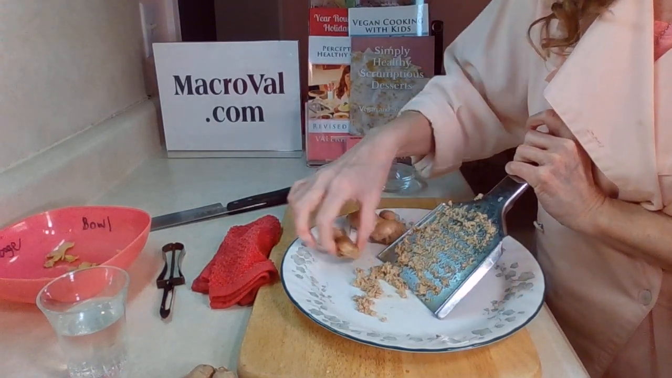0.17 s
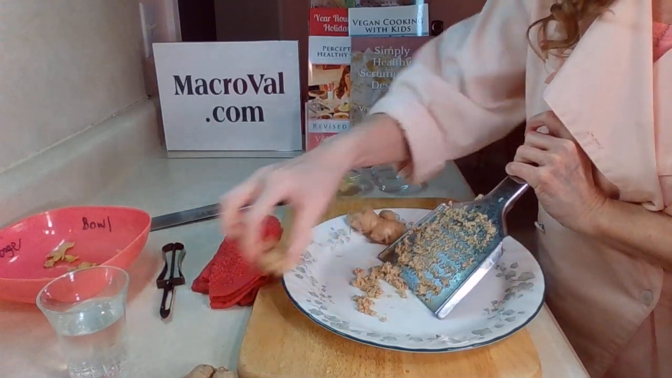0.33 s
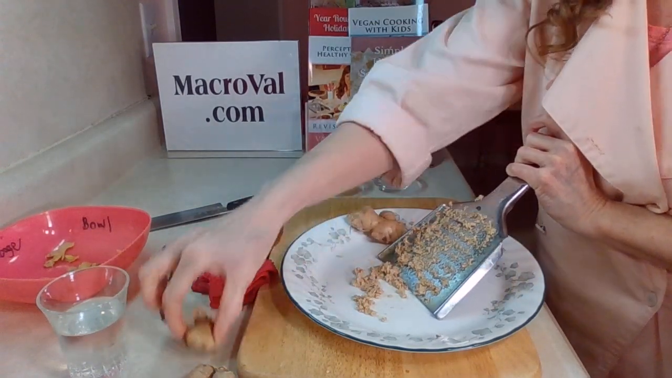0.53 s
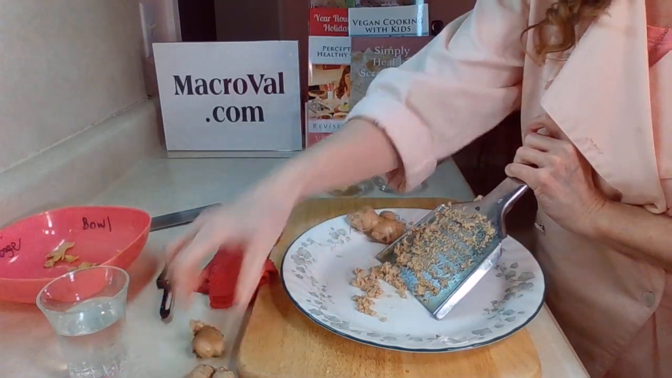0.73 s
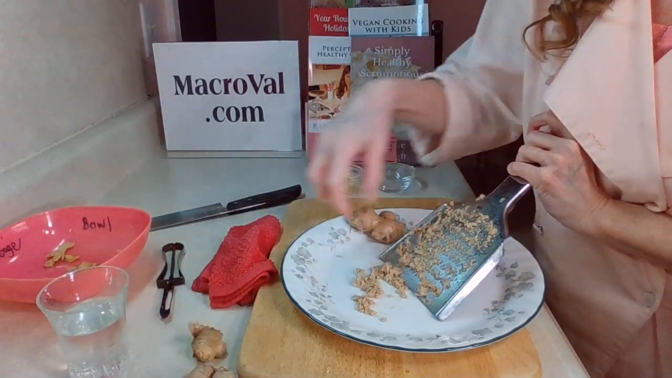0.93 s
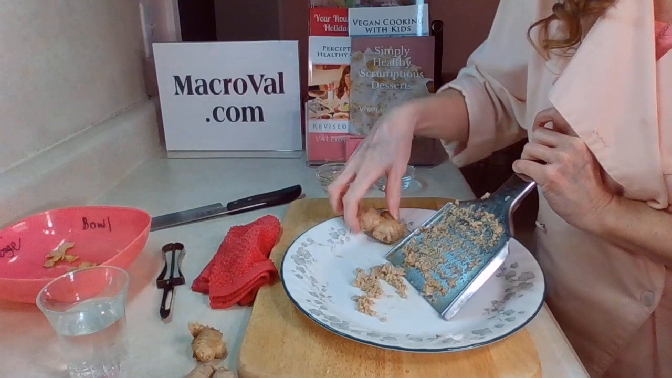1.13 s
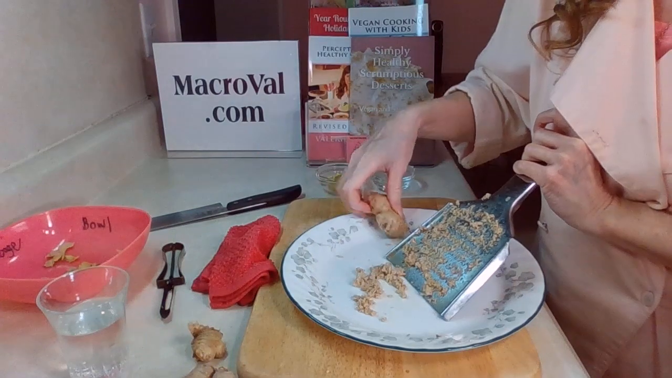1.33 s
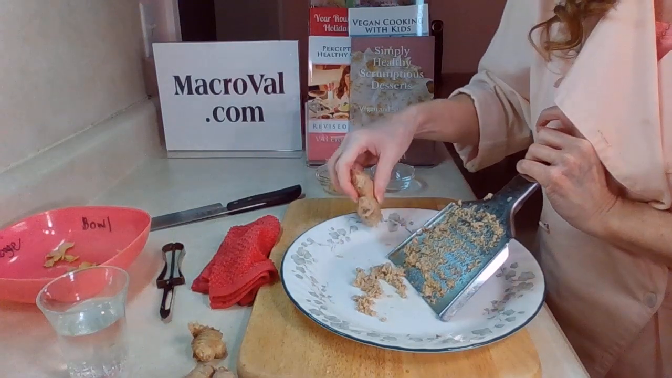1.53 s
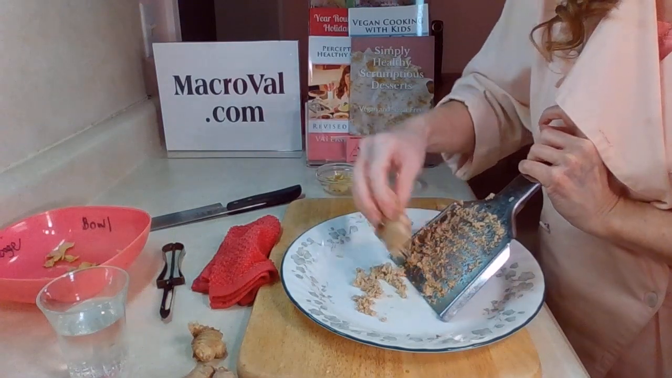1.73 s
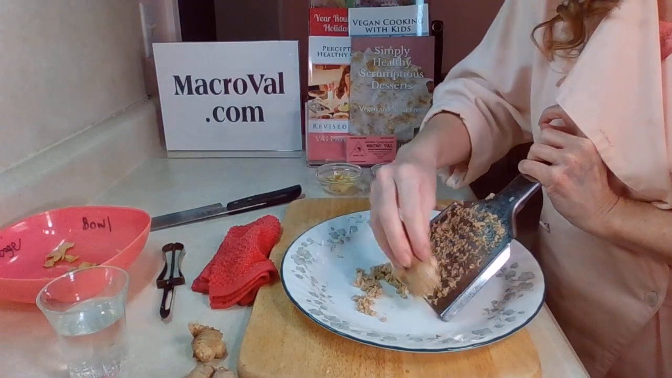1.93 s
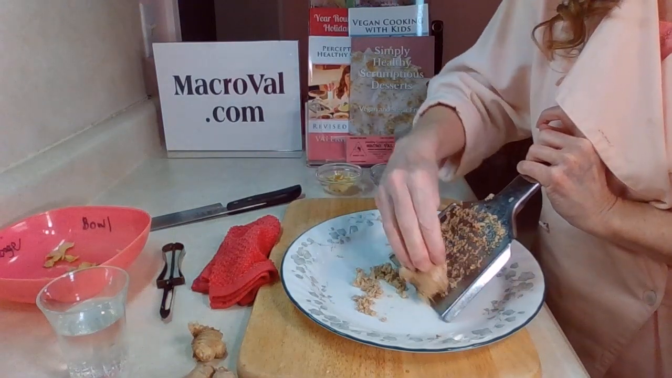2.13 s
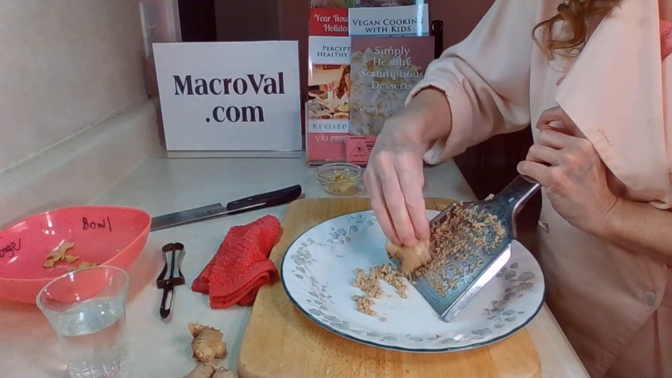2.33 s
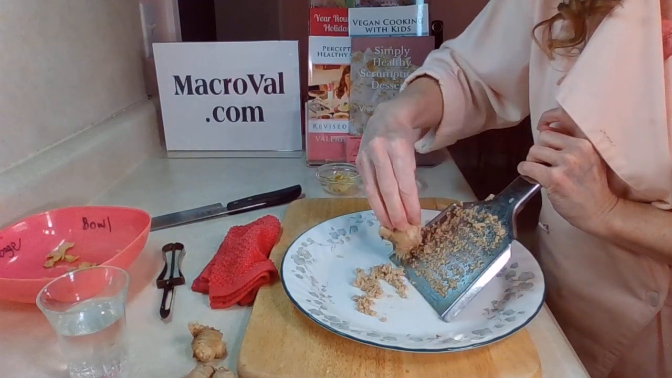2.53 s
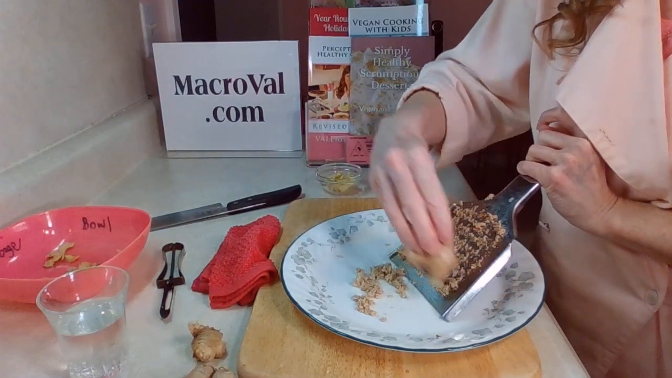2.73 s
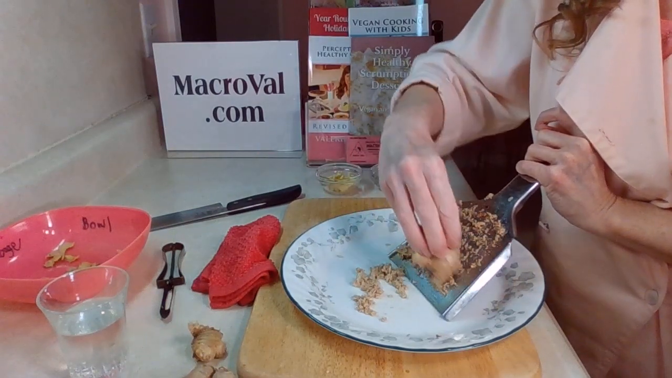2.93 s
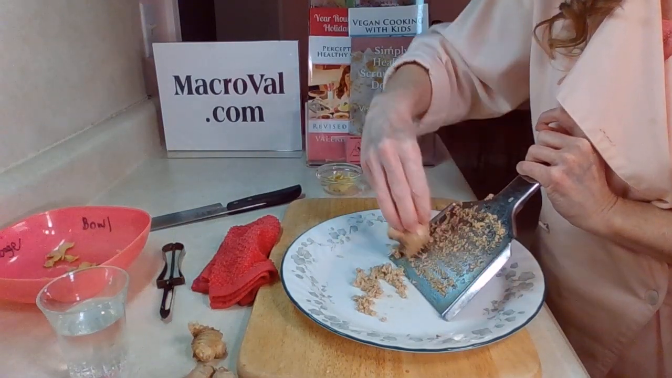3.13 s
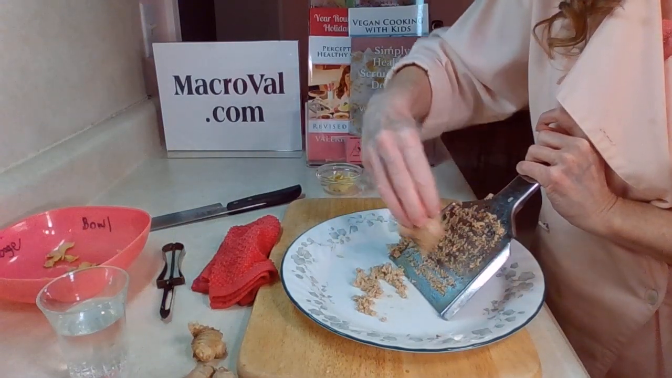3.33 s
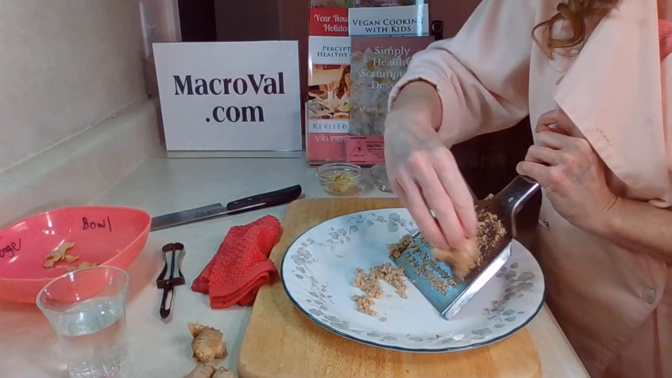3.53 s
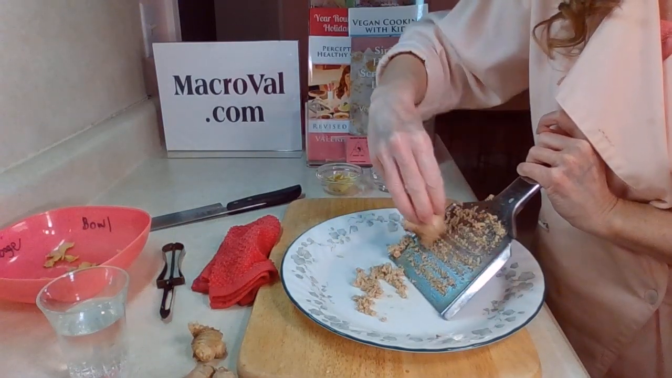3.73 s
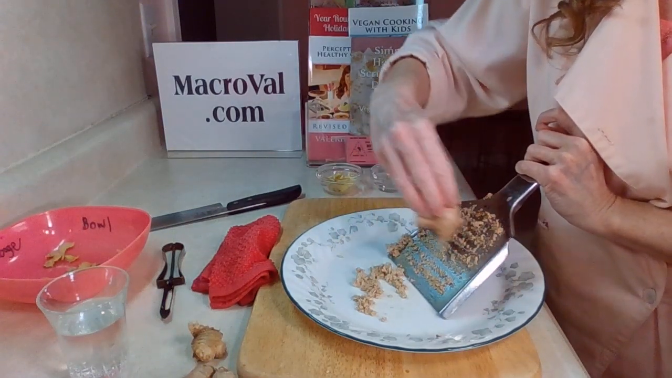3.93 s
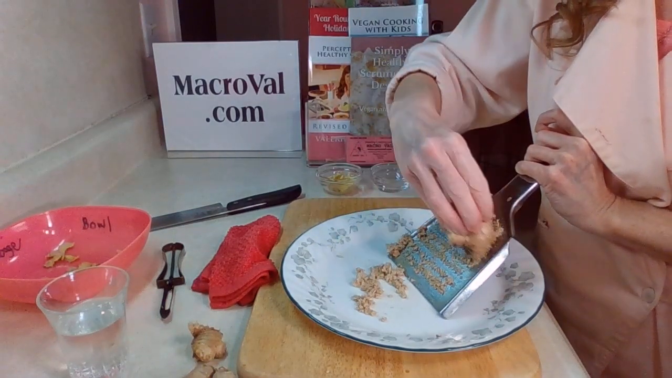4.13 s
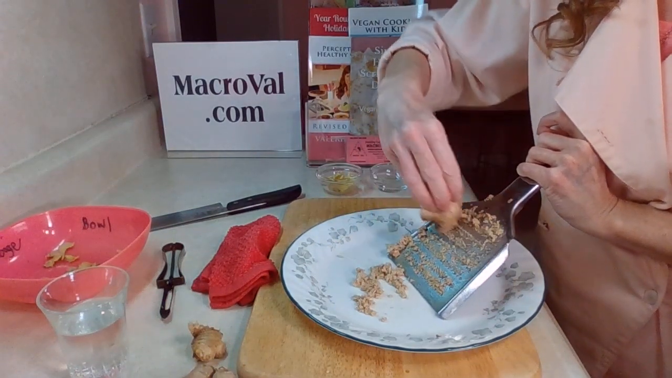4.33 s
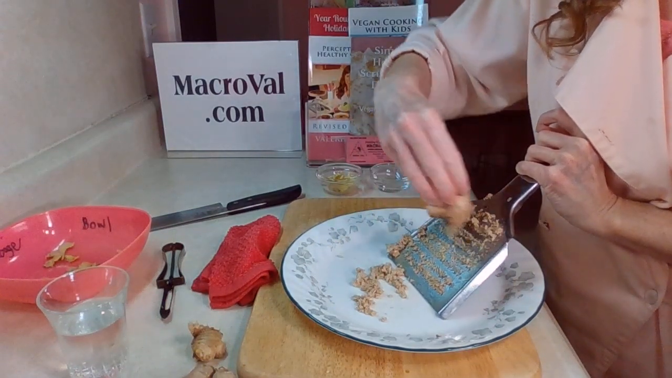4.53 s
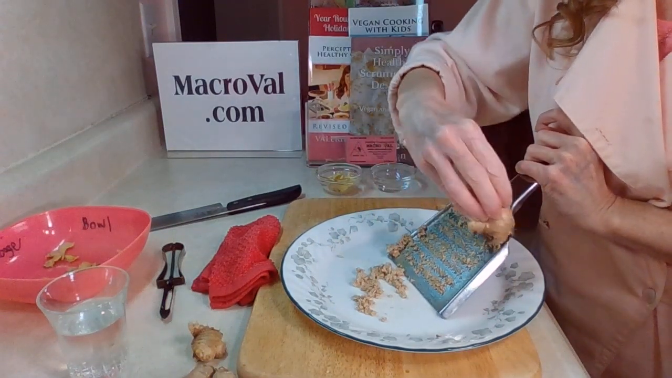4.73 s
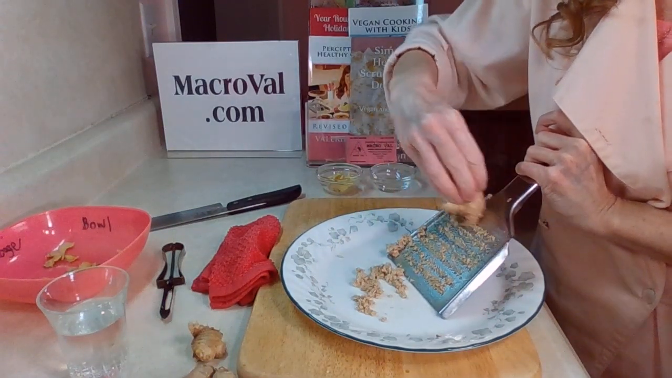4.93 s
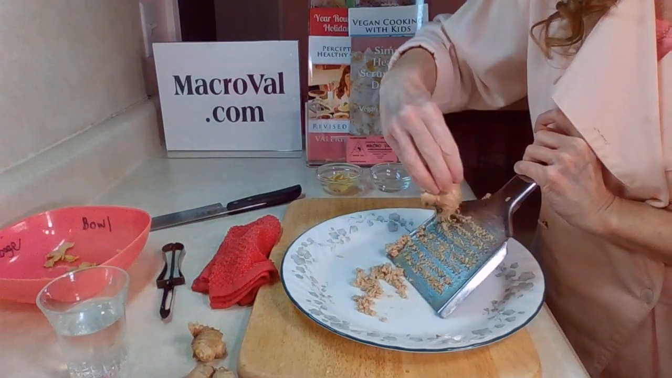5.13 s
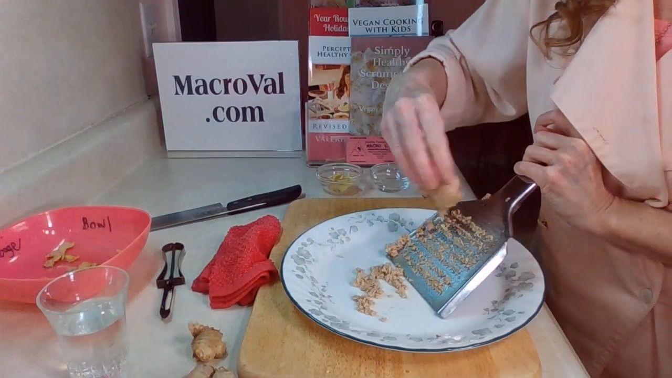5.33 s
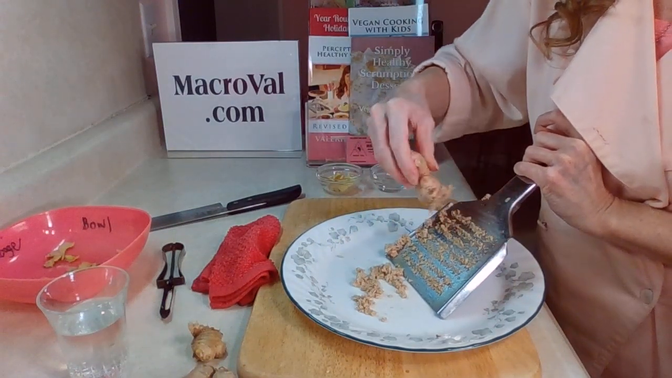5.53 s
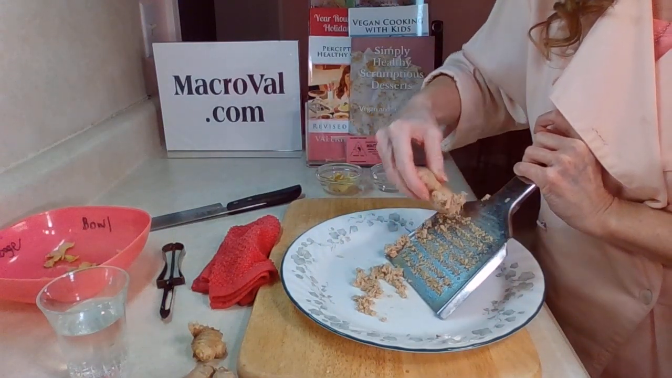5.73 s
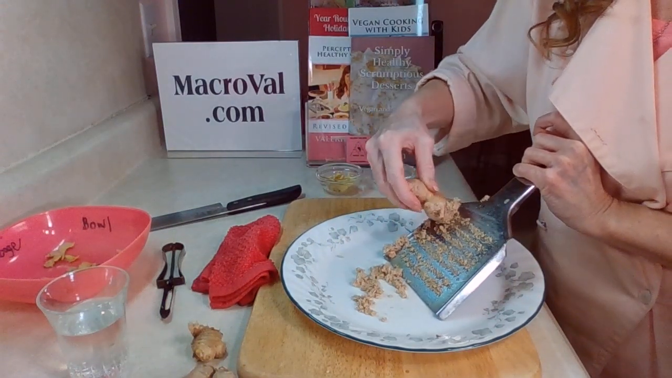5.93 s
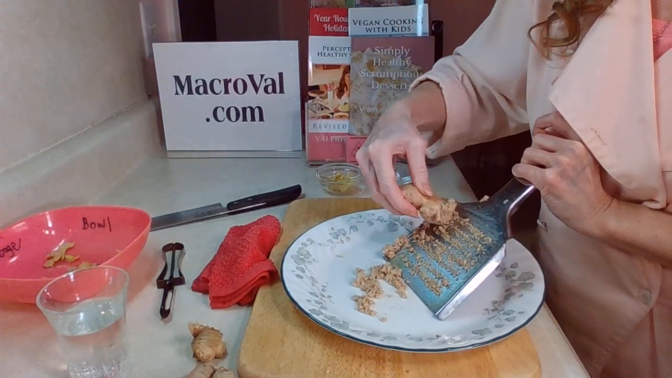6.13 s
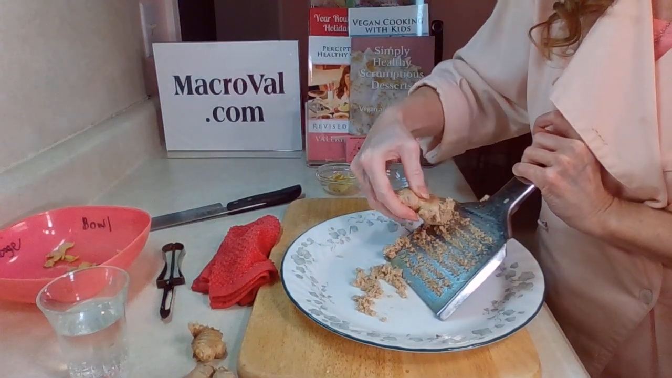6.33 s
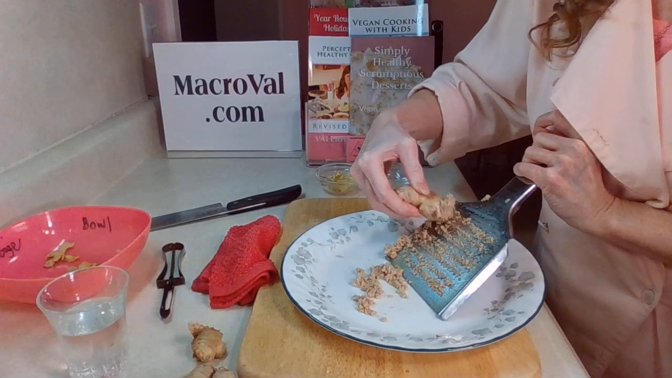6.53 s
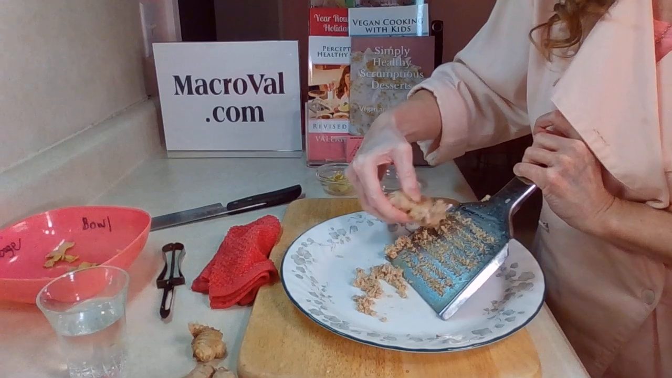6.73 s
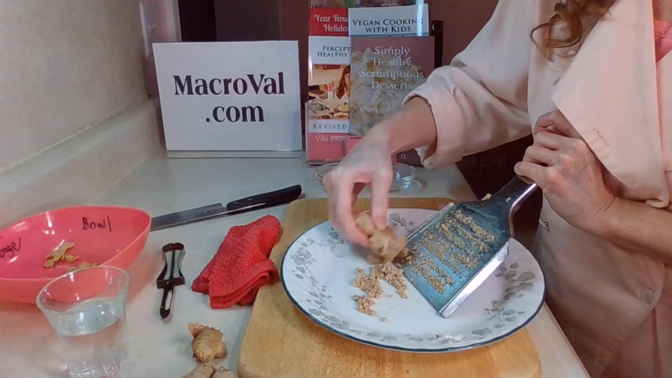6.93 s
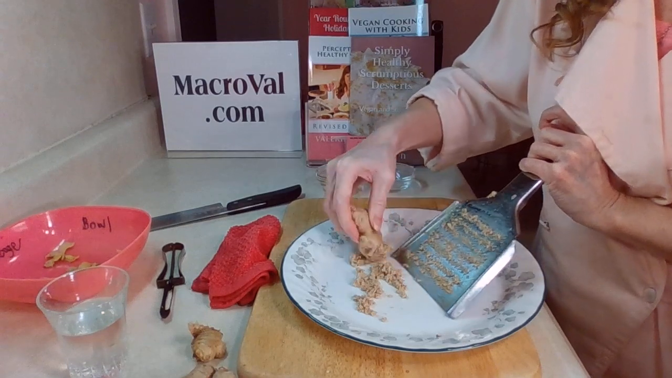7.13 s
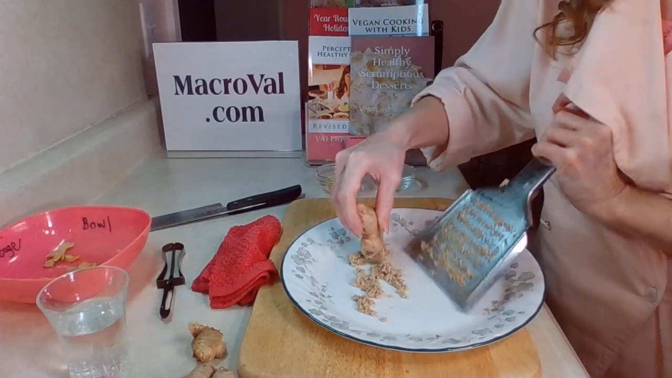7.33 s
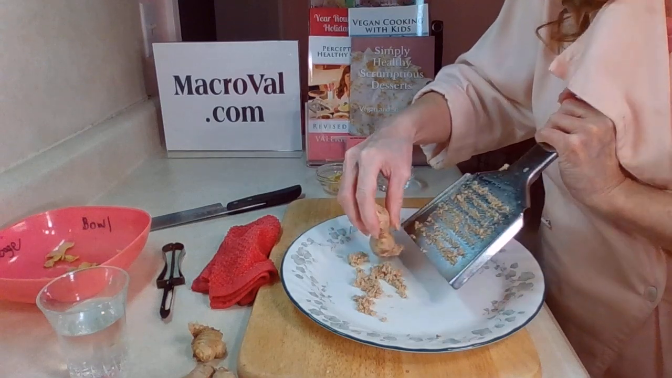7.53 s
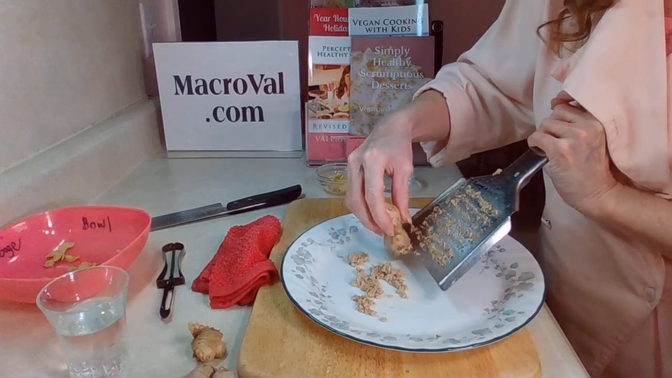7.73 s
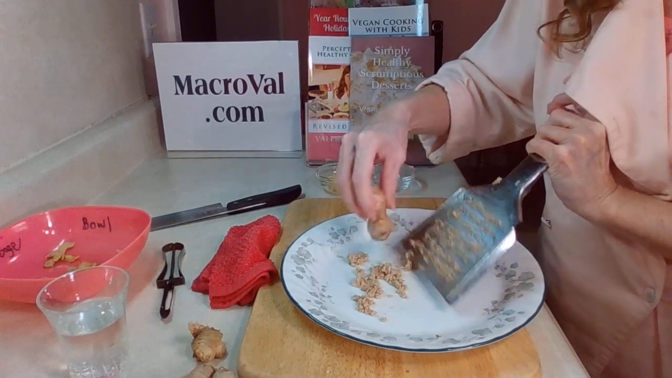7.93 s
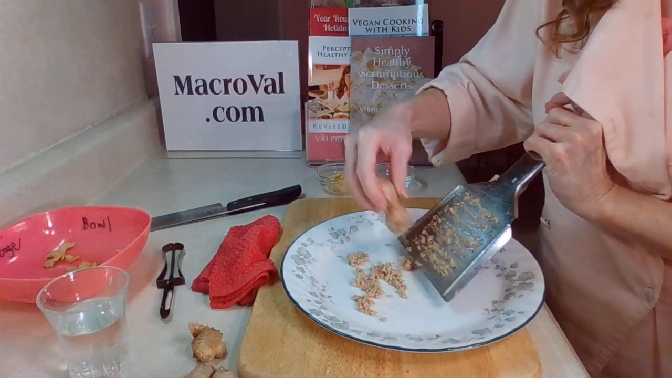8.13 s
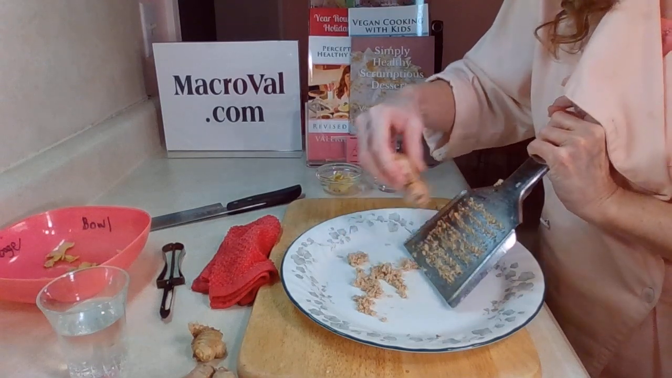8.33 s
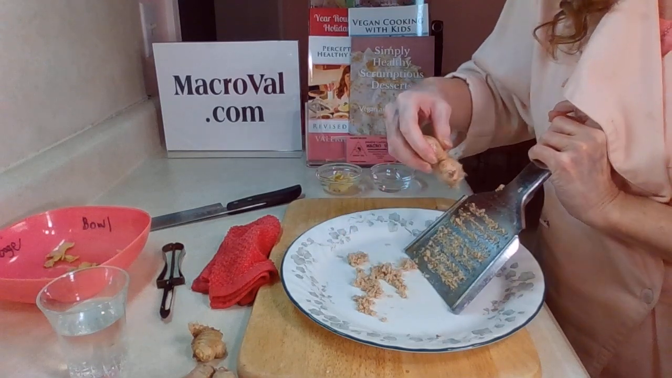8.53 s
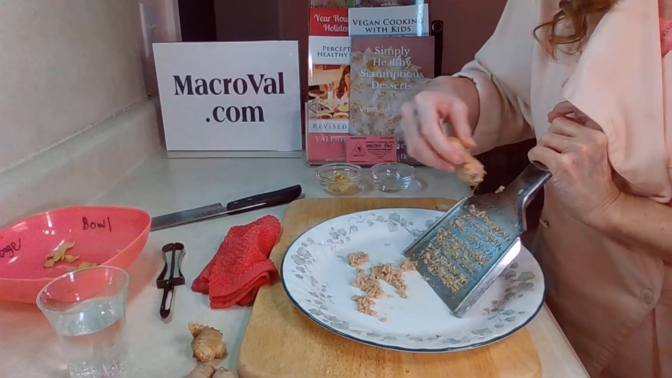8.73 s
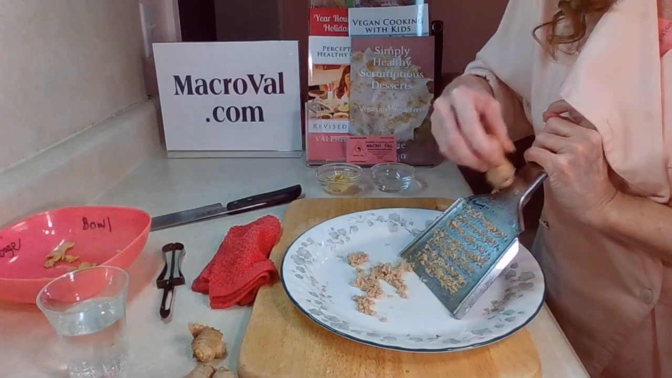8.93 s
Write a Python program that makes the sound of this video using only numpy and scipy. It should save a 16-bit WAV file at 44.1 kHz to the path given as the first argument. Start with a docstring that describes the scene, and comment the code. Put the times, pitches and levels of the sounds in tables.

```python
"""A sleeve rustles over a low mains hum and a thin high hiss, then a piece of ginger drops on the counter.
Another is picked up and grated on a metal grater resting on a china plate in a small, quiet kitchen.
In each stroke, random clicks under a pressure curve tear wet fibres, shake the sheet and judder the board.
The steel edge knocks on the plate: sums of decaying modes plus shaped noise bursts.
Thuds are dulled noise; cloth, air and hiss are coloured noise; the hum is sines."""
import sys
import numpy as np
from scipy import signal
from scipy.fft import rfft, irfft, next_fast_len
from scipy.io import wavfile

SR = 44100
rng = np.random.default_rng(int(sys.argv[2]) if len(sys.argv) > 2 else 0)


def store_pcm(level_fs):
    """Save levels as 16-bit WAV."""
    pcm = np.round(np.clip(level_fs, -1, 1) * 32767).astype(np.int16)
    wavfile.write(sys.argv[1], SR, np.atleast_2d(pcm).T)


N = 396018
TIME = np.arange(N) / SR
RING = TIME[:SR // 2]  # time axis of one blow
SPAN = len(RING)


def undb(db):
    """Decibels to gain."""
    return 10 ** (np.asarray(db) / 20)


def unit(x):
    """Scale to rms 1."""
    return x / np.sqrt(np.mean(x ** 2))


def attack_unit(x, size=800):
    """Scale a blow so that its first samples have rms 1."""
    return x / np.sqrt(np.mean(x[:size] ** 2))


def decay(t60):
    """Exponential decay that falls 60 dB in t60 seconds."""
    return np.exp(-np.log(1000) * RING / t60)


def fader(s, db):
    """Gain along a level curve, silent outside it."""
    return undb(np.interp(TIME, s, db)) * (TIME >= s[0]) * (TIME <= s[-1])


def gesture(s, hold, attack, release, easing_db=0, quiet_db=-25):
    """One move of the hand: swells until s, falls by easing_db while held (rises if negative), dies away."""
    times = [s - attack, s, s + hold, s + hold + release]
    return fader(times, [quiet_db, 0, -easing_db, quiet_db - easing_db])


def shape(x, gain):
    """Filter by a gain that is a function of frequency."""
    size = next_fast_len(len(x))
    hz = np.maximum(np.fft.rfftfreq(size, 1 / SR), 1)
    return irfft(rfft(x, size) * gain(hz), size)[:len(x)]


def colour(x, points):
    """Give x a spectrum of (Hz, dB) points, at rms 1."""
    hz, db = np.transpose(points)
    return unit(shape(x, lambda f: undb(np.interp(np.log(f), np.log(hz), db))))


def tilt(x, slope_db):
    """Brighten or dull by dB per octave, levelling out below 500 Hz."""
    return shape(x, lambda f: undb(slope_db * np.log2(np.hypot(f, 500) / 2000)))


def low_cut(x, hz):
    """Small bodies radiate no deep bass."""
    return signal.sosfilt(signal.butter(2, hz, "high", fs=SR, output="sos"), x)


def resonance(f, hz, width):
    """Response of one damped resonance, 1 at its centre."""
    return 1 / (1 + 1j * (f * f - hz * hz) / (f * width))


def ripple(depth_db=2.0, count=700):
    """Crowded weak modes of one object: a fixed pattern of fine peaks and dips, weaker below 1500 Hz."""
    db = depth_db * np.clip(rng.standard_normal(count), -2, 2)
    return lambda f: undb(np.interp(f, np.linspace(0, SR / 2, count), db) * f / np.hypot(f, 1500))


def walk(rate):
    """Random wander with a spread near 1, rate in new values per second."""
    knots = rng.standard_normal(N // 20)
    return np.interp(TIME * rate, np.arange(len(knots)), knots)


def grains(rate, spread_db):
    """Random clicks, rate per second; a positive spread makes a few large, a negative one a few faint."""
    spread = undb(spread_db * np.minimum(rng.exponential(size=N), 5))
    sizes = rng.standard_normal(N) * spread
    return unit(sizes * (rng.random(N) < rate / SR))


def flat_noise():
    """Equal energy at all frequencies with scattered phases: very many modes at once."""
    return irfft(np.exp(2j * np.pi * rng.random(SPAN // 2 + 1)))


def ring(modes, detune=0.0018):
    """Decaying modes after one blow, each randomly detuned a little."""
    hz, db, t60 = np.transpose(modes)[:, :, None]
    hz = hz * (1 + detune * rng.standard_normal(hz.shape))
    waves = np.sin(2 * np.pi * (hz * RING + rng.random(hz.shape)))
    return attack_unit(np.sum(undb(db) * waves * decay(t60), axis=0))


def contact(length, rest_db, t60):
    """Envelope of a blow: full while the two things chatter, then a weaker decay."""
    chatter = 1 / np.sqrt(1 + (RING / length) ** 8)
    return chatter + undb(rest_db) * decay(t60)


def add(out, s, x):
    """Mix the first 0.4 s of a blow in at time s."""
    i = int(s * SR)
    x = x[:SPAN * 4 // 5]
    out[i:i + len(x)] += x[:N - i]


def shifting(x, depth_db, rate):
    """Each band swells on its own as the root crosses different teeth."""
    bands = [shape(x, lambda f: resonance(f, hz, 0.45 * hz) ** 2) for hz in np.geomspace(2500, 15000, num=9)]
    return x + sum(band * (undb(depth_db * walk(rate)) - 1) for band in bands)


# Strokes and lighter rubs. Each row: full pressure at seconds, hold in seconds, tearing in relative dB,
# push on the sheet in relative dB, weight on the board in dB over the push, easing while held in dB.
STROKES = [(2.235, 0.034, -65.5, -56.5, 2.5, 10), (2.32, 0.12, -55.5, -55.5, 4, -2.5),
           (2.54, 0.019, -55.5, -56.5, 0, 5), (3.026, 0.21, -53.5, -50, 2.5, 5),
           (3.7, 0.15, -53, -50, 2.5, 1), (3.96, 0.037, -71.5, -71, 4.5, 0),
           (4.275, 0.17, -56, -56, 0.5, -2.5), (5.083, 0.051, -58.5, -62.5, -4.5, -5.5),
           (5.885, 0.0044, -62.5, -57.5, 0.5, 3.5), (5.96, 0.028, -72, -66.5, 0, -2),
           (7.2, 0.19, -62, -61.5, -5, -0.5)]
# Spectrum of snapping fibres before the low cut. Each row: frequency in Hz, relative level in dB.
FIBRE_SPECTRUM = [(410, -46), (700, -5), (919, 5.5), (1070, 2), (1320, -17), (1970, 4), (2160, -12),
                  (2730, -7.5), (5710, -5.5), (15500, -4)]
# Sheet under the pressing hand. Each row: resonance in Hz, width in Hz, mean relative level in dB.
SHEET_MODES = [(450, 30, 0.5), (587, 32, 5), (1029, 63, -3), (1161, 37, -16.5), (1437, 74, -18),
               (2154, 45, -4), (3500, 140, -19.5), (5794, 110, -13)]
# Plate and board under the strokes. Each row: frequency in Hz, relative level in dB.
BOARD_SPECTRUM = [(30, -16.5), (55, -6), (80, -3.5), (115, 5.5), (165, 1.5), (200, -8), (240, 1),
                  (320, -12.5), (440, -8.5), (600, -4.5), (720, -19), (1000, -29), (2000, -57)]
BITE_S, TEAR_RELEASE_S, PUSH_RELEASE_S = 0.11, 0.12, 0.16  # the sheet shakes on after the tearing
UNEVEN_DB = 0.5  # wobble of the hand's pressure


def grating():
    """Teeth catch and tear fibres in uneven bursts that also ring the sheet and shake plate and board."""
    tearing, push, weight = np.zeros((3, N))
    for s, hold_s, tear_db, push_db, weight_db, easing_db in STROKES:
        tearing += undb(tear_db) * gesture(s, hold_s, BITE_S, TEAR_RELEASE_S, easing_db)
        pressure = undb(push_db) * gesture(s, hold_s, BITE_S, PUSH_RELEASE_S, easing_db)
        push += pressure
        weight += undb(weight_db) * pressure
    catch = unit(undb(2.5 * walk(rate=130) + UNEVEN_DB * walk(rate=38)))

    snaps = colour(grains(rate=2600, spread_db=-1.5), FIBRE_SPECTRUM)
    fibres = shape(snaps, lambda f: f / np.hypot(f, 2800))
    # the thin steel lends the crackle its many small peaks
    fibres = shape(fibres, ripple(depth_db=2.5, count=160))
    fibres = shifting(fibres, depth_db=3.2, rate=38)

    tugs = grains(rate=1200, spread_db=0.8)
    sheet = np.zeros(N)
    for hz, width_hz, db in SHEET_MODES:
        # each mode swells as the root passes its antinodes
        swell = undb(db + 1.5 * walk(rate=14))
        sheet += swell * shape(tugs, lambda f: resonance(f, hz, width_hz))

    board = colour(grains(rate=1100, spread_db=-2.0), BOARD_SPECTRUM)
    return catch * (undb(1.4) * tearing * unit(fibres) + undb(-4) * push * unit(sheet) + weight * board)


# Single fibres snap or wet pulp smacks. Each row: start in seconds, relative level in dB, centre in Hz.
SNAPS = [(1.761, -61.5, 14000), (1.87, -66.5, 13000), (2.153, -61.5, 12100), (2.398, -44, 8540),
         (2.936, -60.5, 12000), (3.095, -49.5, 11000), (3.266, -52, 6900), (3.6, -55.5, 12600),
         (3.705, -48, 10200), (3.867, -50, 13000), (4.201, -54.5, 13300), (5.143, -53, 7000),
         (5.655, -63, 13100), (5.878, -58, 12500)]
# The wet root slides over the sheet. Each row: fullest at seconds, hold in seconds, relative level in dB,
# centre in Hz at the fullest moment.
SLIDES = [(4.335, 0.037, -61, 7750), (5.11, 0.023, -59.5, 7620), (6.974, 0.088, -45.5, 12230)]
SLIDE_ATTACK_S, SLIDE_RELEASE_S, SLIDE_FALL_OCT_PER_S = 0.12, 0.037, 3.1


def pulp():
    """Fibres snap as resonant noise bursts; the sliding root hisses as noise on a falling carrier."""
    out = np.zeros(N)
    for s, db, hz in SNAPS:
        burst = shape(flat_noise(), lambda f: resonance(f, hz, 0.36 * hz))
        add(out, s, undb(db) * unit(burst) * contact(length=0.0074, rest_db=-26.5, t60=0.06))
    fizz = unit(shape(rng.standard_normal(N), lambda f: 1 / (1 + (f / 1900) ** 2)))
    fizz *= undb(1.5 * walk(rate=150))
    for s, hold_s, db, hz in SLIDES:
        fall_s = np.clip(TIME - s, -SLIDE_ATTACK_S / 2, 1)
        centre_hz = hz * 2 ** (-SLIDE_FALL_OCT_PER_S * fall_s)
        hiss = unit(fizz * np.cos(2 * np.pi * np.cumsum(centre_hz) / SR))
        out += undb(db) * gesture(s, hold_s, SLIDE_ATTACK_S, SLIDE_RELEASE_S) * hiss
    return out


# The grater meets the plate. Each row: start in seconds, attack level in dB, plate's share of power 0-1,
# chatter length in seconds, brightness in dB per octave.
KNOCKS = [ (1.191, -66, .5, 0.0088, 2), (3.598, -63, 0, 0.011, 0), (3.914, -55.5, 0.1, 0.011, -6.5),
          (4.834, -19.5, 0.15, 0.012, -1), (5.821, -47, 0.02, .013, -1.5), (6.776, -62, .1, 0.036, -0.5),
          (6.854, -22, 0.42, .014, -1), (7.251, -55.5, 0, 0.015, -3), (7.271, -51.5, 0, 0.012, -1),
          (7.328, -56, 0, 0.014, -2), (7.344, -51.5, 0.09, 0.014, -3), (8.506, -16.5, 0.99, 0.014, -0.5),
          (8.519, -17.5, 1, 0.021, -1), (8.56, -19, 0.9, 0.017, -0.3), (8.743, -29.5, 0.72, 0.015, -2)]
# Ringing grater before contact damping. Each row: mode in Hz, relative level in dB, t60 in seconds.
GRATER_MODES = [(384, -5, 0.055), (1047, -0.5, 0.19), (2014, -4, 0.37), (3110, -5, 0.17), (3540, -10, 0.36),
                (3575, -13, 0.17), (4135, -20.5, 0.041), (4750, -11, 0.44), (5050, -19, 0.45),
                (5330, -5, 0.12), (5440, -18.5, 0.1), (5937, -21.5, 0.2), (6975, -21, 0.21),
                (7460, -20.5, 0.21), (8300, -29, 0.2), (8530, -20.5, 0.22), (8592, -17, 0.24),
                (9120, -19.5, 0.34), (9290, -10.5, 0.14), (9730, -20, 0.13), (9900, -25.5, 0.31),
                (11700, -30.5, 0.23), (12300, -18, 0.14), (12100, -20, 0.15)]
# Plate under the steel edge. Each row: mode in Hz, relative level in dB.
PLATE_MODES = [(1184, -39), (1674, -44.5), (2110, -41), (2950, -43.5), (3085, -49.5), (3418, -43),
               (3521, -44), (3736, -46), (4011, -45), (5006, -43), (5356, -39), (5647, -47), (6099, -55.5),
               (6562, -49.5), (7047, -45), (7321, -44), (7957, -53.5), (8387, -42), (8624, -47.5),
               (9297, -45.5), (9448, -43.5), (10616, -40), (11224, -46), (12349, -52), (12845, -53.5),
               (13410, -48.5), (13878, -43.5), (14357, -51.5)]
# Crowded short modes of steel on china. Each row: frequency in Hz, relative level in dB.
CLASH_SPECTRUM = [(50, -31.5), (130, -8.5), (230, -6), (300, -14), (560, -10), (860, -17.5), (1000, -0.5),
                  (1180, -2.5), (1400, -14.5), (2100, -4), (2650, -14), (3400, -10.5), (6300, -14.5),
                  (15500, -19.5)]
# Plate ringing freely, also used by chinks(). Each row: mode in Hz, relative level in dB, t60 in seconds.
CHIME_MODES = [(1782, -2.5, 0.92), (3150, -1, .5), (4040, 4, 0.58), (4980, 3, 0.69), (5960, 3, .38),
               (6982, -3.5, .34), (8070, -12.5, .4), (9120, -12, .45), (10620, -11.5, .4),
               (14976, -12.5, 0.41)]


def knocks():
    """The steel edge chatters on the china; both ring, and are damped as the edge settles."""
    out = np.zeros(N)
    weak_modes = ripple(depth_db=6.5, count=520)
    plate = [(hz, db, 0.18 * (hz / 2000) ** -0.2) for hz, db in PLATE_MODES]
    for s, db, share, chatter_s, bright_db in KNOCKS:
        modes = np.sqrt(1 - share) * ring(GRATER_MODES, detune=0.0056) + np.sqrt(share) * ring(plate)
        clash = colour(shape(flat_noise(), weak_modes), CLASH_SPECTRUM)
        blow = modes * contact(chatter_s, rest_db=-11.0, t60=0.92)
        blow += undb(2.0) * clash * contact(chatter_s, rest_db=-12.5, t60=0.34)
        # the hand soon weakens the strong low bending mode
        bending = shape(blow, lambda f: resonance(f, 1100, 300))
        blow = blow - 0.5 * bending * (1 - np.exp(-RING / 0.074))
        # the plate sings on faintly after the blow
        singing = share * undb(-27.0) * tilt(ring(CHIME_MODES), slope_db=-11.0)
        blow = tilt(blow, bright_db) + singing
        add(out, s, undb(db) * attack_unit(blow * (1 - np.exp(-RING / 0.002))))
    return low_cut(out, hz=105)


# The root nudges the plate as it is picked up. Each row: start in seconds, relative level in dB.
NUDGES = [(1.199, -76), (1.382, -63), (1.447, -64.5), (1.552, -75.5)]
# Light touches on the lifted grater. Each row: start in seconds, attack level in dB, brightness in dB per octave.
TOUCHES = [(7.868, -62, 3.5), (7.885, -62.5, 4.5), (8.165, -59, -8.5), (8.197, -65.5, 5.5),
           (8.893, -59, 3.5)]
# Lifted grater ringing lightly. Each row: mode in Hz, relative level in dB, t60 in seconds.
LIFTED_MODES = [(599.5, 4, 0.33), (2050, -4, 0.16), (2410, -3, 0.12), (3050, 2, 0.11), (3370, -6, 0.096),
                (4000, -8.5, 0.14), (4660, -9, .14), (5900, -4.5, 0.12), (6998, -16, .14), (11000, -9, .12),
                (13378, -6, 0.11), (14777, -11, .12)]


def chinks():
    """The nudged plate and the lifted grater ring freely, each with a brief scuff."""
    out = np.zeros(N)
    for s, db in NUDGES:
        # each spot on the rim favours other modes
        modes = [(hz, mode_db + 3 * rng.standard_normal(), t60) for hz, mode_db, t60 in CHIME_MODES]
        chime = tilt(ring(modes), slope_db=-1.8) * contact(length=0.019, rest_db=0.5, t60=1.8)
        scuff = undb(2.5) * unit(flat_noise()) * contact(length=0.011, rest_db=-18, t60=0.1)
        add(out, s, undb(db) * (chime + scuff))
    for s, db, bright_db in TOUCHES:
        scuff = undb(-7) * colour(flat_noise(), CLASH_SPECTRUM)
        scuff *= contact(length=0.025, rest_db=-19.0, t60=0.12)
        touch = tilt(ring(LIFTED_MODES, detune=0.0093) + scuff, bright_db)
        add(out, s, undb(db) * attack_unit(touch))
    return out


# The root lands on counter, plate or grater. Each row: start in seconds, attack level in dB,
# treble limit in Hz, contact length in seconds.
THUDS = [(0.505, -61.5, 1500, 0.0072), (.708, -20, 3500, .017), (.733, -26, 405, .016),
         (.881, -41.5, 990, 0.015), (1.171, -55, 2500, 0.009), (1.397, -52.5, 348, 0.026),
         (2.152, -33.5, 195, 0.021), (2.936, -56, 346, .017), (4.387, -52, 128, 0.052),
         (5.827, -53, 169, 0.03), (6.84, -44.5, 198, 0.054)]
# Soft blow on the worktop before the treble limit. Each row: frequency in Hz, relative level in dB.
COUNTER_SPECTRUM = [(30, -40.5), (100, -25.5), (150, -4.5), (240, -1.5), (350, -10.5), (490, -10),
                    (600, 1.5), (720, -10.5), (1060, -16.5), (1500, -32), (1900, -41.5), (3500, -55.5),
                    (6000, -71)]


def thuds():
    """The root lands and tumbles; the softer the blow, the slower it starts and the less treble it has."""
    out = np.zeros(N)
    for s, db, limit_hz, length_s in THUDS:
        body = shape(colour(flat_noise(), COUNTER_SPECTRUM), lambda f: 1 / (1 + (f / limit_hz) ** 4))
        onset = 1 - np.exp(-RING / (0.001 + 1 / limit_hz))
        blow = body * contact(length_s, rest_db=-20.5, t60=0.16) * onset
        add(out, s, undb(db) * attack_unit(low_cut(blow, hz=120.4)))
    return out


# Sleeve and fingers move. Each row: fullest at seconds, hold in seconds, brushing in dB, cloth rumble in dB.
SLEEVE_MOVES = [(0, 0.068, -74, -59), (.5, 0.074, -66.5, -66), (1.07, 0.021, -65.5, -61.5),
                (1.45, 0.089, -73, -70), (7.42, .15, -68.5, -70.5)]
# Spectrum of the cloth rumble. Each row: frequency in Hz, relative level in dB.
CLOTH_SPECTRUM = [(88, -14), (150, 5), (238, -11), (548, -4), (630, -11), (1260, -16), (1940, -16.5),
                  (2570, -17.5), (6000, -29.5), (7800, -52), (13200, -120)]
REACH_ATTACK_S, REACH_RELEASE_S = 0.42, 0.36


def sleeve():
    """Cloth brushes (dense clicks) and rumbles (wavering noise) as the arm moves."""
    brush = unit(shape(grains(rate=6200, spread_db=0.8), lambda f: f / np.hypot(f, 2500)))
    rumble = colour(rng.standard_normal(N), CLOTH_SPECTRUM) * undb(2.4 * walk(rate=25))
    out = np.zeros(N)
    for s, hold_s, brush_db, rumble_db in SLEEVE_MOVES:
        cloth = undb(brush_db) * brush + undb(rumble_db) * rumble
        out += gesture(s, hold_s, REACH_ATTACK_S, REACH_RELEASE_S) * cloth
    return out


def kitchen(x, wet_db=-13, low_t60=0.41, high_t60=0.2, early_db=-12):
    """Early echoes off counter and wall, then a short diffuse tail whose treble dies first."""
    noise = flat_noise()
    low = shape(noise, lambda f: 1 / (1 + (f / 1500) ** 2))
    tail = low * decay(low_t60) + (noise - low) * decay(high_t60)
    tail *= 1 - np.exp(-RING / 0.0074)
    early = np.zeros(SPAN)
    early[rng.integers(SR // 600, SR // 70, size=12)] = rng.standard_normal(size=12)
    echoes = undb(wet_db) * tail / np.linalg.norm(tail) + undb(early_db) * early / np.linalg.norm(early)
    return x + signal.fftconvolve(x, echoes)[:N]


# Mains hum. Each row: frequency in Hz, level in dB about which it wavers.
HUM = [(120, -65.5), (180, -84.5), (240, -81.5)]
# Still kitchen air. Each row: frequency in Hz, relative level in dB.
AIR_SPECTRUM = [(30, -34), (64, -17.5), (100, -8.5), (150, -5), (220, -10.5), (600, -13), (1050, -21),
                (2800, -25), (9000, -28.5), (15500, -30)]
# Thin high hiss. Each row: frequency in Hz, relative level in dB.
HISS_SPECTRUM = [(9600, -30.5), (9950, -8), (10100, 0), (10300, -6), (10600, -15), (11200, -17),
                 (11800, -34)]
AIR_DB, HISS_DB = -69, -73.5


def background():
    """Slightly wavering mains sines, still air and a thin high hiss of coloured noise."""
    hum = np.zeros(N)
    for hz, db in HUM:
        tone = unit(np.sin(2 * np.pi * (hz * TIME + rng.random())))
        hum += undb(db + 2.1 * walk(rate=5.2)) * tone
    air = undb(AIR_DB + 0.53 * walk(rate=0.85)) * colour(rng.standard_normal(N), AIR_SPECTRUM)
    hiss = undb(HISS_DB) * colour(rng.standard_normal(N), HISS_SPECTRUM)
    return hum + air + hiss


def scene():
    """All sounds at the counter, in the room, in one channel."""
    counter = grating() + pulp() + knocks() + chinks() + thuds() + sleeve()
    return (kitchen(counter) + background())[None]


def record(dry):
    """The recorder thins the deep bass, rounds the loudest peaks and cuts the top."""
    top_hz, ceiling = 15900, 0.55
    thin = signal.sosfilt(signal.butter(2, 40, "high", fs=SR, output="sos"), dry)
    rounded = ceiling * np.tanh(thin / ceiling)
    return signal.sosfilt(signal.ellip(10, 0.2, 70, top_hz, fs=SR, output="sos"), rounded)


dry = scene()
out = record(dry)
store_pcm(out)
```